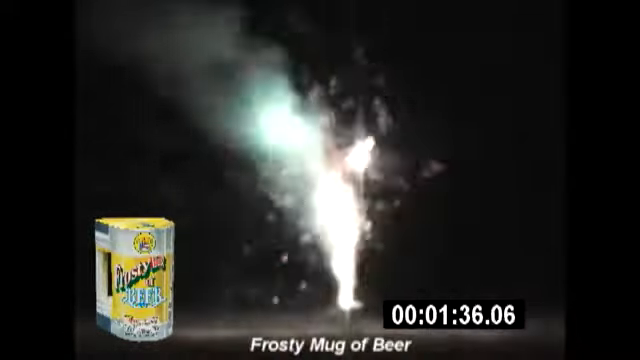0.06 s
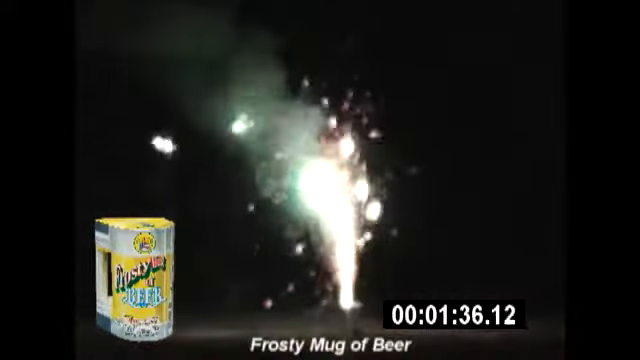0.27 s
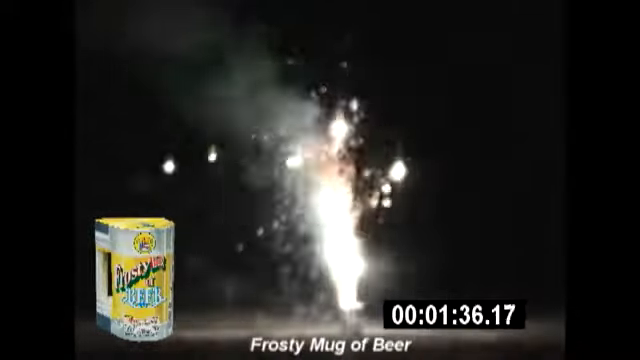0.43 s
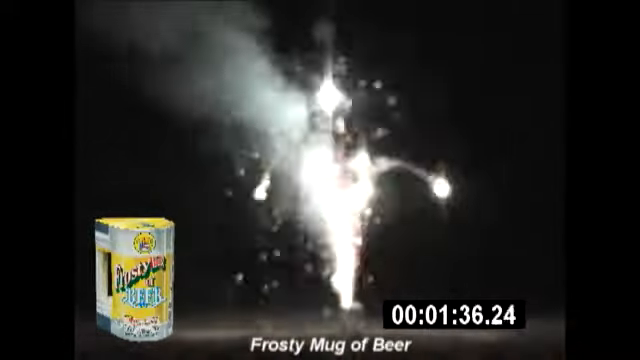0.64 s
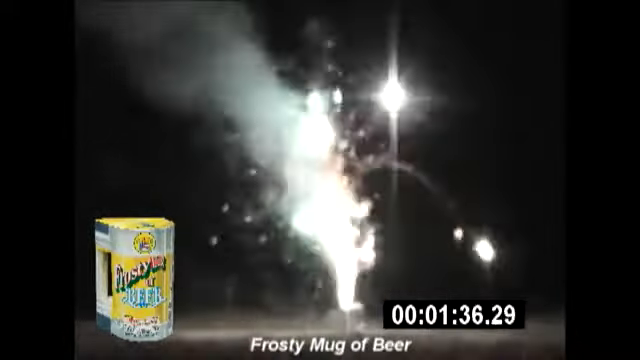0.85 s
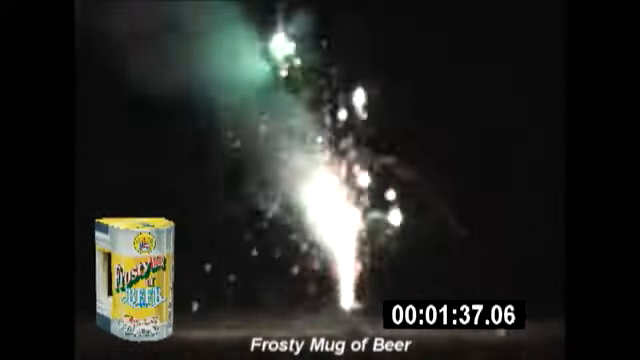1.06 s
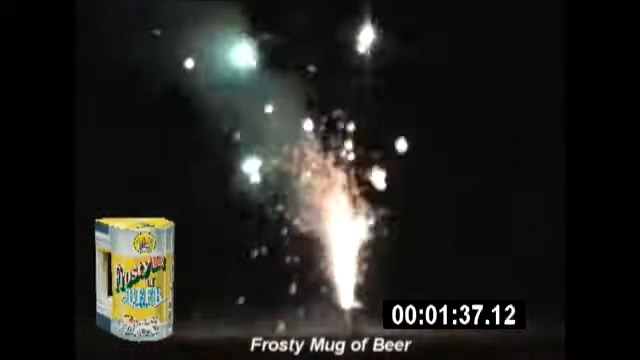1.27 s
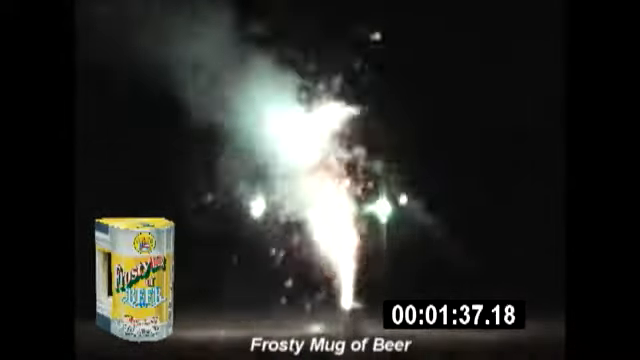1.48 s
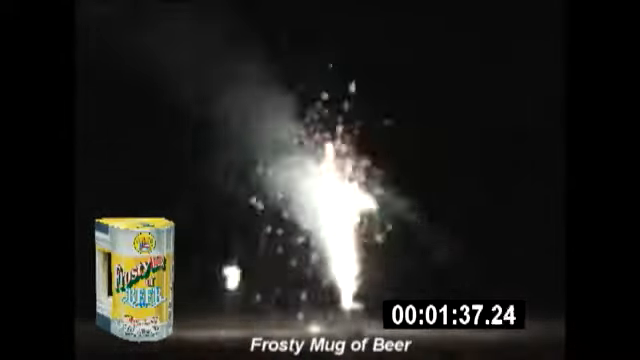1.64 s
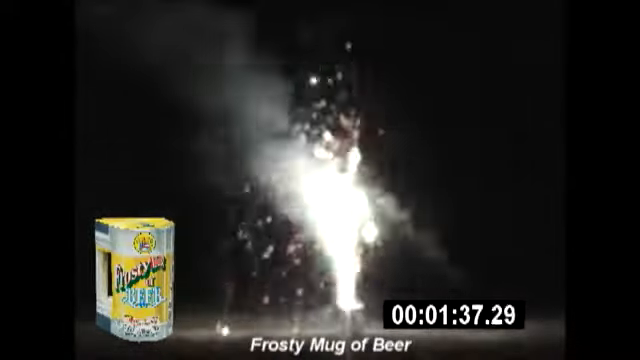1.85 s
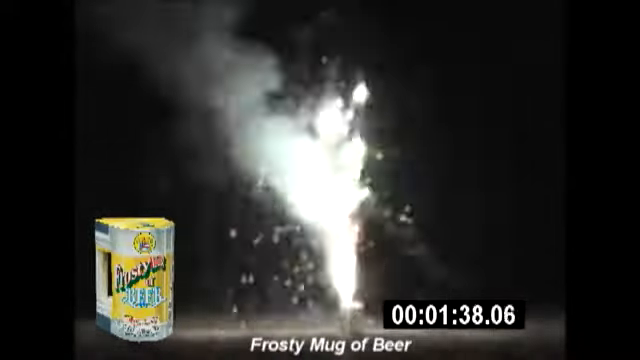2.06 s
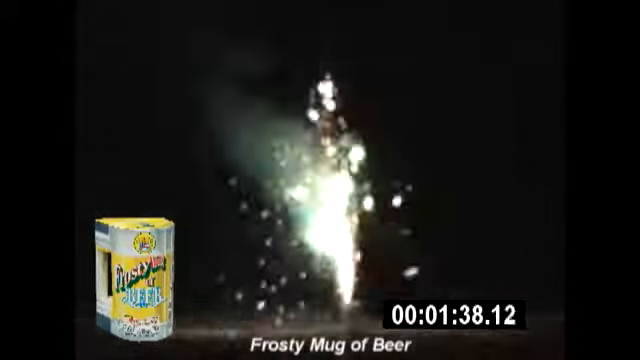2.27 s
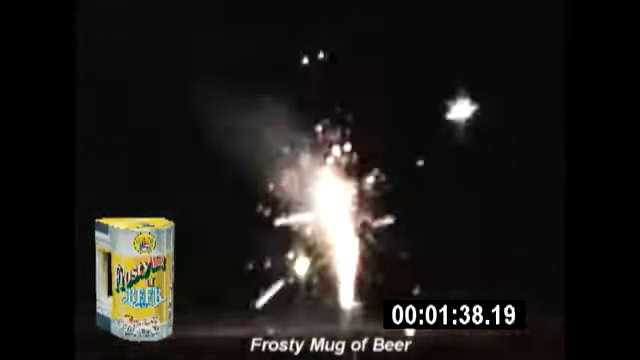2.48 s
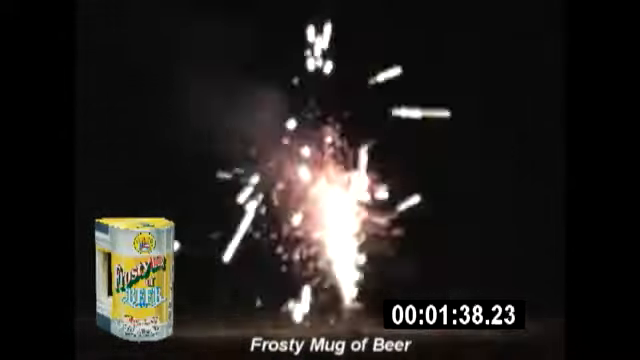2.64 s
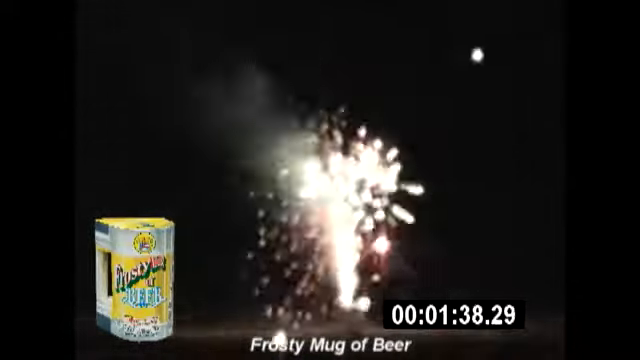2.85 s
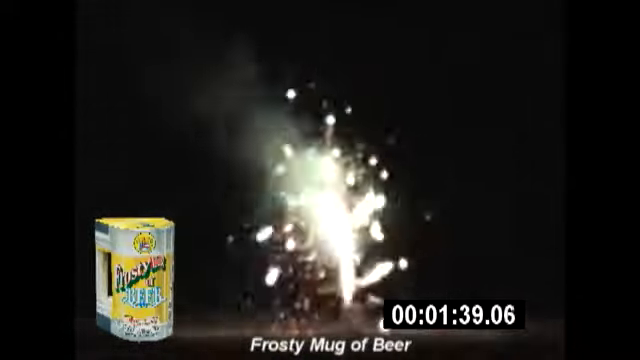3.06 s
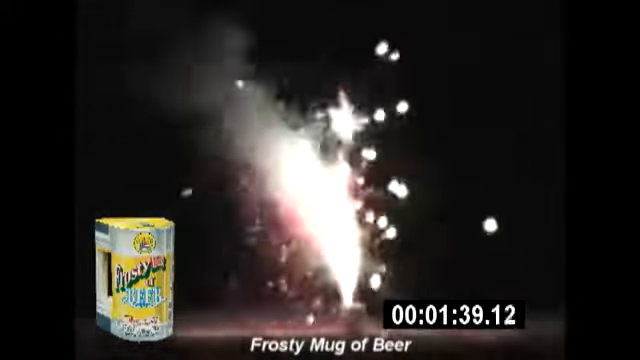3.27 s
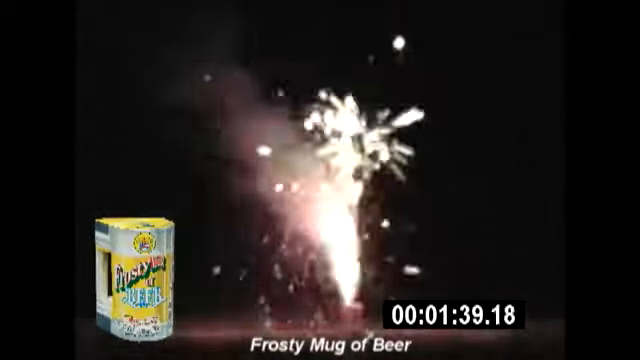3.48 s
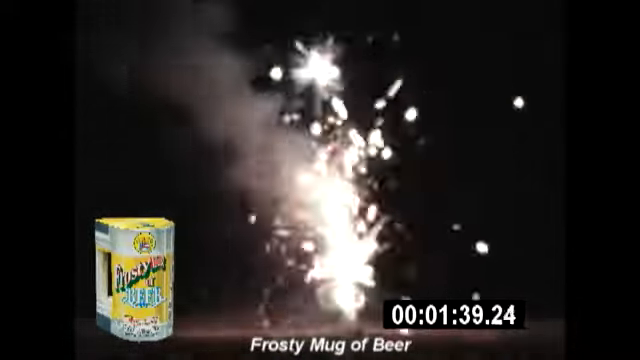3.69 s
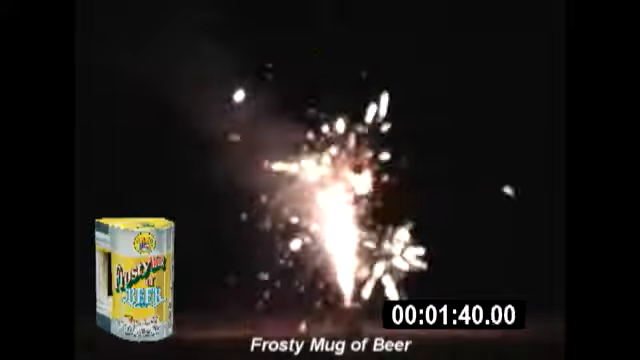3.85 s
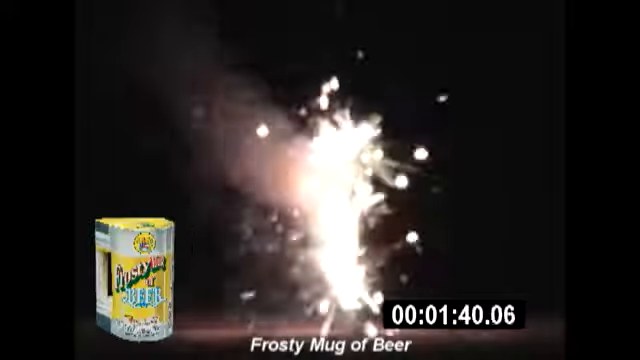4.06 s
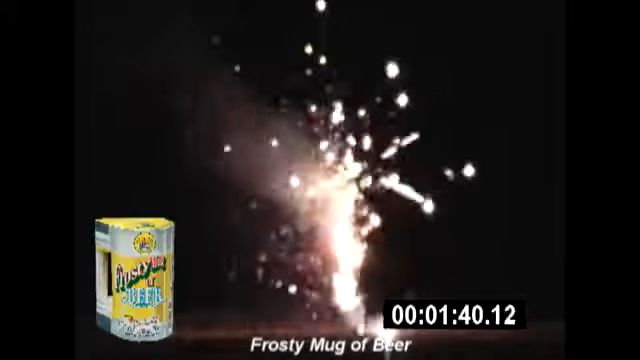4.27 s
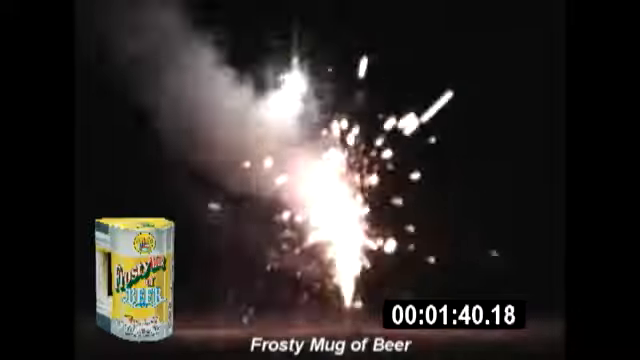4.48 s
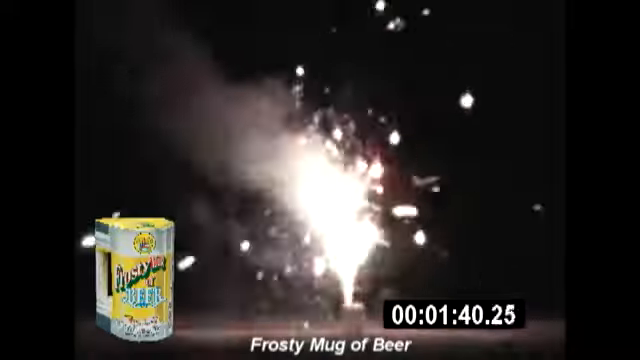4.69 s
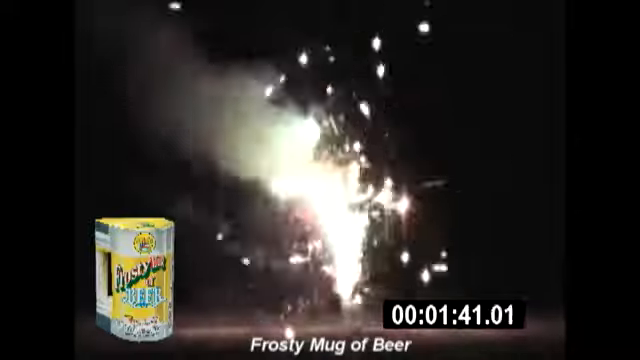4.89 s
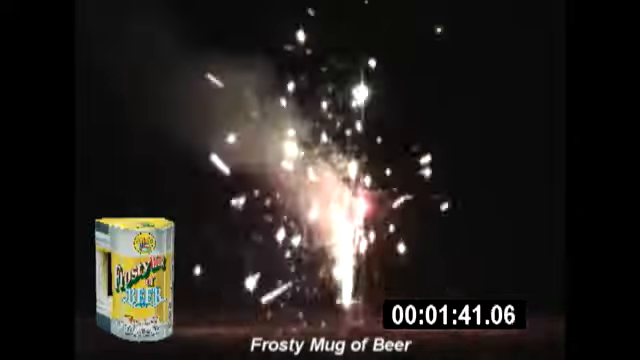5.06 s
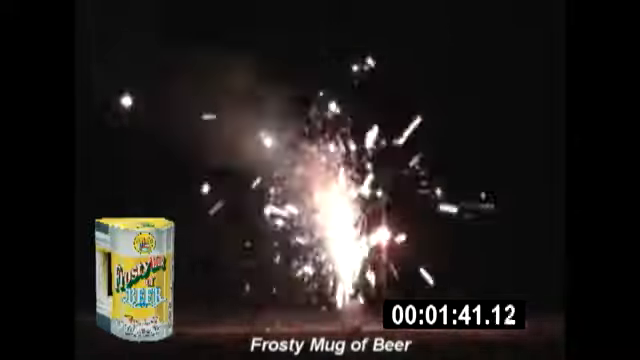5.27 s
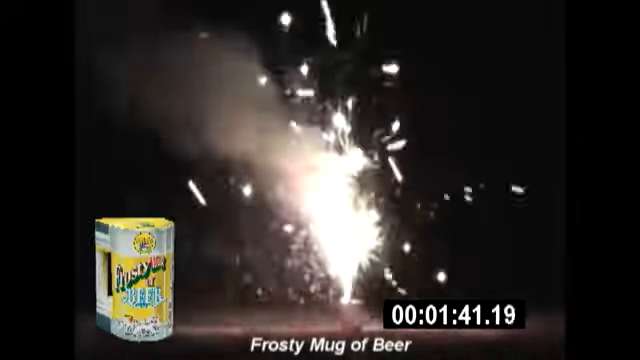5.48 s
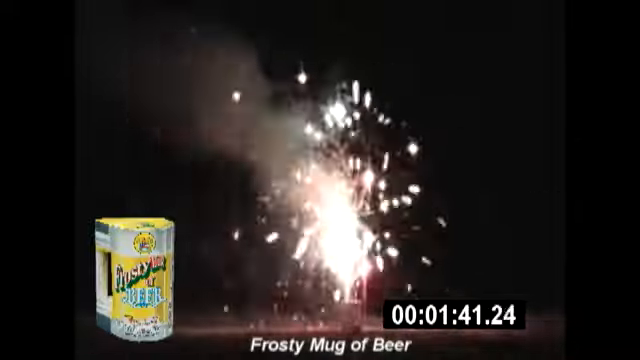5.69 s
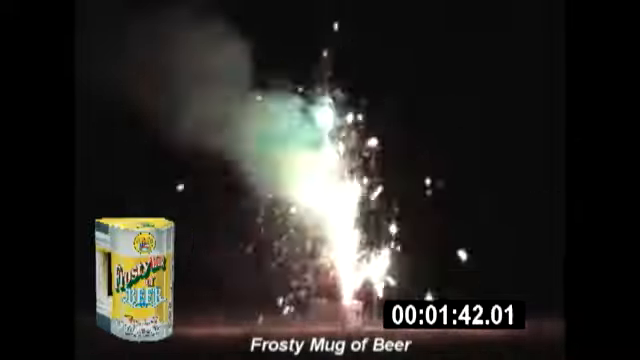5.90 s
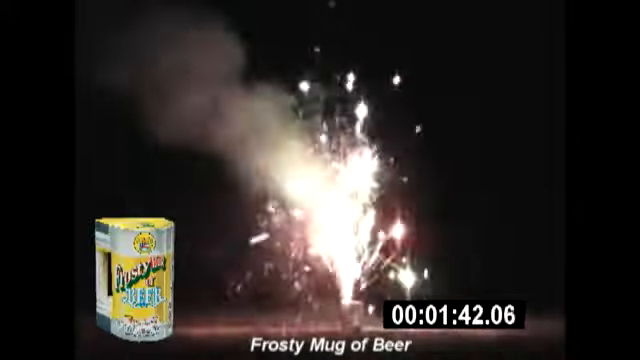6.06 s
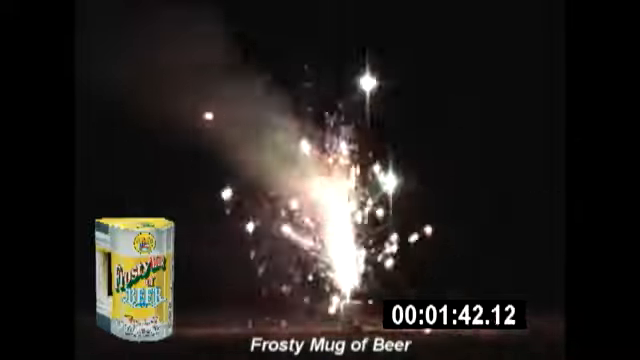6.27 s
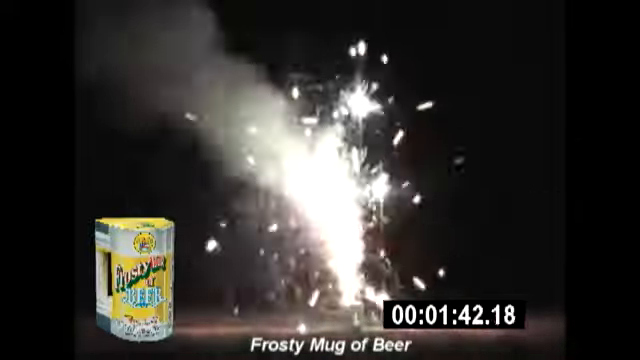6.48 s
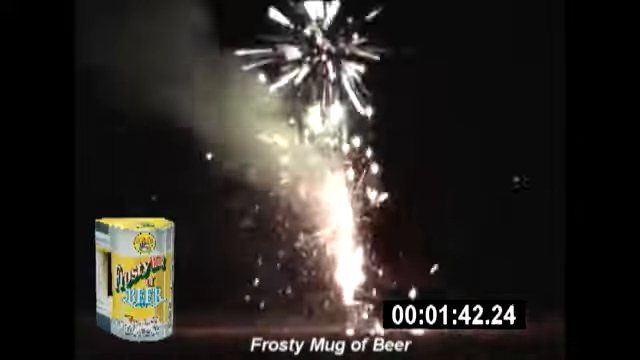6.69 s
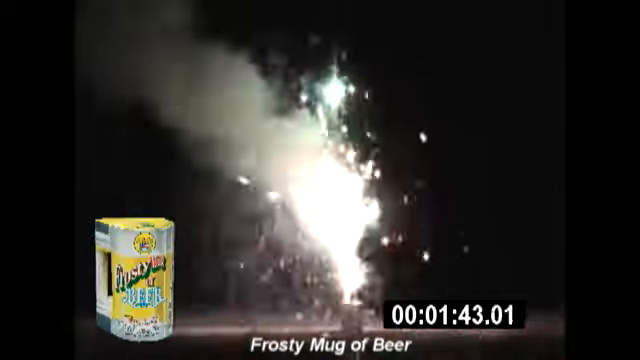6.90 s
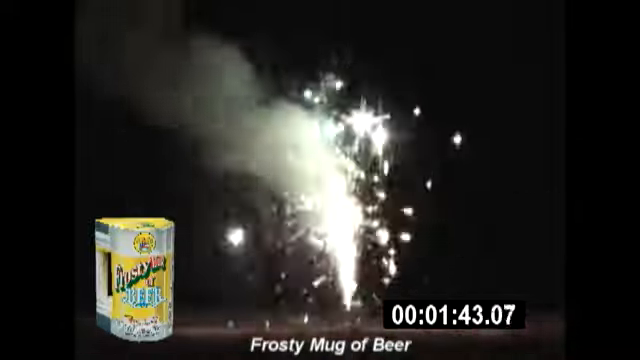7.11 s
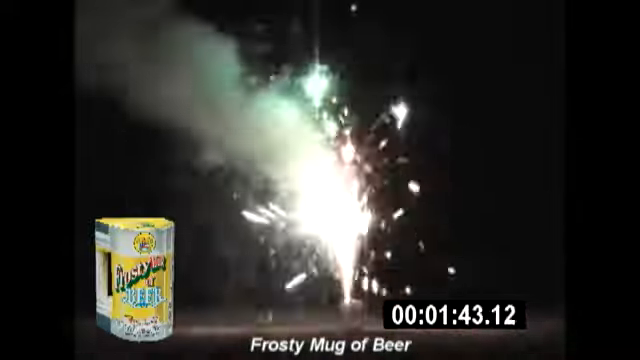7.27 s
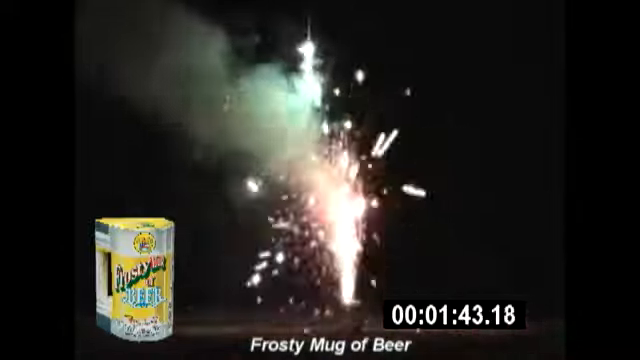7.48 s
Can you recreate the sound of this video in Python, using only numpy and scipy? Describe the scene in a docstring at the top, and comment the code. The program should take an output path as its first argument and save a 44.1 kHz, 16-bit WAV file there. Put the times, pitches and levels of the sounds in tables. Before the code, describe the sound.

Steady rushing jet of burning sparks outdoors, soon buried under a frantic barrage of sharp, dry snaps and pops, the loudest ones distorting.

```python
"""A fountain firework stands on the ground at night, some metres from a microphone.
At first a jet of burning gas roars and hisses: two bands of noise whose levels follow a table.
From 1.7 s stars crackle in the spray; from about 2.2 s the jet is heard at a lower, uneven level.
Each star is a tiny blast that rings the microphone housing, repeats via the ground and sizzles;
smaller bursts follow, a wall answers, and the loudest blasts overload the recorder.
Faint dull ticks sputter all along."""
import sys
import numpy as np
from scipy import signal
from scipy.fft import rfft, irfft, next_fast_len
from scipy.io import wavfile
from scipy.ndimage import uniform_filter1d

SR = 44100
rng = np.random.default_rng(int(sys.argv[2]) if len(sys.argv) > 2 else 0)


def master(y):
    """Save y as 16-bit WAV."""
    cut = np.clip(np.atleast_2d(y).T, -1, 1)
    pcm = np.round(cut * 32767)  # scale
    wavfile.write(sys.argv[1], SR, pcm.astype(np.int16))


N = 332514  # length in samples

# bursting stars: t/s, level/dB, body against that level/dB
STARS = [(1.699, -9.5, -4.5), (1.888, -25.5, 1), (2.0096, -10.5, -5.5), (2.124, -4.5, -2),
         (2.1448, -28, -2), (2.2081, -12.5, 3), (2.2611, -2.5, -5.5), (2.268, -23, -6), (2.2823, -27, -2),
         (2.2849, -19, 0), (2.2887, -14, -6), (2.308, -8, -5), (2.3737, -3, 0), (2.42, -12.5, -1.5),
         (2.4368, -17, 5), (2.4378, -9.5, -7), (2.457, -16.5, -3), (2.5417, -4.5, -2), (2.5647, 1.5, -7),
         (2.5875, -24, 3), (2.6196, -7.5, -8), (2.6664, -15.5, -14), (2.6892, -16, -15),
         (2.7136, -3.5, -1.5), (2.7191, -6.5, -2), (2.7413, -7, -8), (2.7493, -8, 2.5), (2.8141, -10.5, 0),
         (2.822, -6, 0), (2.831, -13, 0), (2.8339, -3, -6.5), (2.8413, -3, 5), (2.8474, -28, -16),
         (2.8543, -23, 2), (2.8587, -3.5, -2), (2.879, -21, -3), (2.8924, -10, -8), (2.9097, -7, -0.5),
         (2.9832, -15.5, 0.5), (3.0068, -6, -12), (3.0245, -21, -4), (3.029, -17, 0), (3.03, -12.5, -9),
         (3.0436, -21, 7), (3.0773, -9.5, -12), (3.1556, -21, -12), (3.1688, -4.5, -7), (3.1752, -31, -17),
         (3.1826, -13, -4), (3.2154, -14.5, 5), (3.2201, -16.5, 6), (3.2274, -7, -7), (3.2862, -12, -6.5),
         (3.2937, -22, -10), (3.3324, -12.5, -19), (3.3449, -10.5, 4.5), (3.3605, -6.5, -1.5),
         (3.3813, -8, -12), (3.397, -3.5, -1.5), (3.4167, -18, 4), (3.4273, -12, -9), (3.4473, -19, -6),
         (3.4641, 3.5, 1.5), (3.4854, -15, -7), (3.5008, -17, -5), (3.504, -9.5, -8), (3.5121, -12.5, -6),
         (3.5585, -9, 3.5), (3.5757, -3.5, -9), (3.5951, -8, -5), (3.6012, -19, -12), (3.608, -8, -5),
         (3.6104, -14, -2), (3.632, -22, -10), (3.6449, -7.5, 0.5), (3.6773, -20, 0), (3.6803, -12.5, 2),
         (3.7407, 5, -6.5), (3.7526, -19, 1), (3.7607, -17.5, 5.5), (3.7706, -31, -6), (3.79, -23, -6),
         (3.797, -13.5, 0), (3.8043, -8, 6), (3.839, -2.5, -3.5), (3.846, -13, -6), (3.8495, -14, -11),
         (3.86, -29, 3), (3.8624, -17, 5), (3.869, -7.5, -9), (3.8926, -13, 0), (3.8973, -11.5, -7),
         (3.9093, -6, -24), (3.915, -27, -2), (3.921, -15, -3), (3.924, -10.5, -5), (3.9656, -11, -10),
         (3.9998, -2, -2.5), (4.0062, -17, -5), (4.0279, -18, -4), (4.0344, -16, -2), (4.0622, -9.5, -14),
         (4.0742, -19, -6), (4.0806, -8.5, -6), (4.1372, -17.5, -2), (4.152, -3.5, -1.5), (4.161, -14, 0),
         (4.17, -7, -23), (4.1818, -7, -17), (4.1915, -18, 7), (4.1946, -8, -2), (4.2042, -9.5, -4),
         (4.2107, -22, -3), (4.2346, -3, 1.5), (4.2484, -15, -12), (4.2564, -11, -15), (4.2875, -26, -10),
         (4.2917, 0.5, -8), (4.3026, -12, -16), (4.3147, -36, -7), (4.317, -13, -7), (4.3245, -19, -9),
         (4.3747, -13.5, 0), (4.3782, -14, -21), (4.3843, -24, 7.5), (4.4099, -22, -9), (4.4263, -10.5, -1),
         (4.4417, -11, -5.5), (4.4811, -9.5, -5.5), (4.5076, -14.5, -5.5), (4.5589, -21.5, -1),
         (4.5836, -23, 7.5), (4.587, -11, -6), (4.6101, -6, -4), (4.616, -21, -1), (4.6352, -22, -1),
         (4.6485, -10, -0.5), (4.6767, 2.5, -1.5), (4.688, -9, -11), (4.7128, -7, -14), (4.729, -6.5, -1.5),
         (4.7543, -7.5, -10), (4.7559, -10.5, -2), (4.778, -8.5, -3), (4.8024, -17, 1), (4.8343, -13, -12),
         (4.8514, 2.5, -10), (4.8613, -35, 0), (4.8763, -23, 4.5), (4.8964, -9.5, -5), (4.9333, -12, -1),
         (4.9384, -17.5, 0), (4.9421, -4, -7), (4.9486, -5.5, -1), (4.9555, -8, -18), (4.9637, -20, -3),
         (4.9694, -16, -9), (4.9752, -6.5, -9), (4.9954, -4.5, -5), (5.0118, -15, 0), (5.0237, -15, -20),
         (5.0553, -0.5, -3), (5.0774, -13.5, -1), (5.087, -31, -3), (5.1044, -10.5, -15),
         (5.1652, -13.5, -24), (5.18, -7, -8), (5.2168, -13, -10), (5.229, -12, -6), (5.2368, -4.5, -9),
         (5.245, -3.5, 2), (5.257, -36, -5), (5.2664, -37, -7), (5.2753, -8, -4), (5.3651, -15.5, -7),
         (5.3715, -21, 4.5), (5.3907, -10, -9), (5.3932, -3, -5), (5.4133, -7.5, -10), (5.4291, -8, -15),
         (5.4314, -12, -1), (5.4436, -11, 2.5), (5.466, -1, -15), (5.4747, -8, -3), (5.52, -21, 2.5),
         (5.5793, -21, -10), (5.5889, -11.5, -8), (5.6098, -17, -16), (5.6214, -13.5, -2), (5.629, -8, -4),
         (5.637, -26, -9), (5.6399, -15, -7), (5.6443, -4.5, -2), (5.6803, -9, -9), (5.6882, -14, 2),
         (5.6965, -3.5, -8.5), (5.7092, -6.5, -4), (5.7133, -21, -1), (5.7184, -26, 1), (5.728, -25, -6),
         (5.7363, -13, -6), (5.7432, -17, -2), (5.7627, -20, -13), (5.7934, -5.5, -1.5), (5.8138, -20, 3),
         (5.8326, -8, -23), (5.851, -18, -8), (5.8558, -22, -12), (5.861, -19, -8), (5.8651, -4.5, 0),
         (5.8864, -40, -6), (5.8942, -7.5, -9), (5.953, -11, 0), (5.9738, -16, -5), (5.9865, -13.5, -4),
         (6.0545, -3, -1.5), (6.1112, -14.5, 4), (6.116, -12, 0.5), (6.122, -19, -1), (6.1269, -10, -8),
         (6.132, -21, -16), (6.1524, -18, 0), (6.1612, -12.5, 3), (6.1712, -19.5, -11), (6.2168, -6.5, -6),
         (6.2209, -9.5, -2.5), (6.226, -12.5, 6), (6.2315, -18, 2), (6.2379, -12, -5), (6.2615, -2.5, -3.5),
         (6.275, -12, -5), (6.287, -12, -10), (6.301, -28, 7), (6.3028, -9, -0.5), (6.3813, -13.5, 3),
         (6.4248, -7, -15), (6.4416, -19, 0), (6.465, -8.5, -7), (6.4815, -8, -2), (6.4984, -16.5, 5),
         (6.5112, -18, -3), (6.5182, -9.5, -5), (6.5341, -6, -15), (6.541, -14.5, -2.5), (6.5585, -30, -6),
         (6.5729, -14, 0), (6.5797, -22, -4), (6.582, -18, -9), (6.5884, -2.5, -1), (6.5984, -20, -8),
         (6.6051, -11, -14), (6.644, -19, -8), (6.648, -3, -7.5), (6.661, -24, -10), (6.6685, -14, -4),
         (6.686, -13, -3), (6.7056, -26, 14), (6.7099, -3, -2.5), (6.716, -8, -10), (6.7227, -9, -9),
         (6.732, -9, -2.5), (6.7417, -31, -1), (6.7486, -17, -3), (6.7539, -19, 2), (6.7635, -10.5, -5),
         (6.8275, -17, -4), (6.8306, -5.5, -2), (6.838, -21, -14), (6.852, -22, 3), (6.8641, -20, -3),
         (6.8885, 1.5, -2), (6.9091, -26, -3), (6.912, -9, -9), (6.92, -27, -5), (6.9296, -8.5, -5.5),
         (6.9649, -11, 0), (6.9837, -33, -1), (6.9874, -3.5, -10), (6.997, -17, 1), (7.0178, -9, -14),
         (7.0324, -13, -5), (7.0808, -7, -4), (7.1012, -13, -12), (7.1412, -6, -5), (7.153, -18, 2),
         (7.184, -10, -11), (7.1974, -12, -1), (7.2035, -26, -3), (7.206, -10, -11), (7.2116, -9, -17),
         (7.2244, -25, -8), (7.2438, -22, -3), (7.2693, -4.5, -4.5), (7.3082, -11.5, -9),
         (7.3167, -11.5, -0.5), (7.3896, -10, -4), (7.4011, -8, -4), (7.4415, -6.5, -9), (7.4548, -8.5, 0),
         (7.477, -18, 5), (7.4789, -5.5, -9), (7.5141, -7, -4)]
# ringing of the microphone housing and capsule: f/Hz, level/dB, time to fall by 60 dB/s
# the sharp snap of a blast rings the high tones, its body the middle ones, its thump the low ones
SNAP_TONES = [(8950, 0, 0.0016), (4870, 2, 0.0011), (8100, -7, 0.00057), (10406, -4.5, 0.0026),
              (13800, -10, 0.00017), (3530, -18.5, 0.0014)]
BODY_TONES = [(1993, -1.5, 0.0094), (1405, -1, 0.0038), (2606, 2, 0.0018), (1170, -24.5, 0.0033)]
THUMP_TONES = [(468, 0.5, 0.011), (600, -2, 0.018), (242, 1, 0.023)]
# sizzle after a blast, from burning crumbs, then scattered returns: level/dB, time to fall by 60 dB/s
SIZZLE = [(-8.5, 0.0091), (-12, 0.039)]
# level at which the jet is heard, lower during the crackle: t/s, roar level/dB, hiss level/dB
JET_LEVELS = [(0.0, -33.5, -32.5), (1.0, -35, -33.5), (2.1, -35, -34.5), (2.3, -41, -44),
              (2.85, -41, -44.5), (3.1, -38, -41.5), (3.35, -40.5, -38), (3.8, -43, -63), (4.2, -47, -46),
              (4.7, -43.5, -45), (5.25, -43.5, -44), (5.6, -39.5, -40), (6.0, -44.5, -44),
              (6.45, -38.5, -39), (6.8, -51, -56), (7.54, -46, -56)]
# tone colour of the roar in the tube: f/Hz, level/dB per Hz
ROAR_COLOUR = [(15, -63), (25, -31), (43, -16), (65, -18), (199, 0), (341, -5.5), (381, -19.5), (483, -3.5),
               (566, -14), (652, -10.5), (840, -20), (1100, -33), (1430, -56), (2420, -120)]
# tone colour of the hissing spray: f/Hz, level/dB per Hz
HISS_COLOUR = [(530, -46), (900, -15.5), (1050, -12), (1500, -5.5), (1710, -7), (2000, 3), (2220, -10),
               (2660, -5), (3420, -6.5), (4400, 0), (5800, -1.5), (6600, -9.5), (9200, -6.5), (10500, -8.5),
               (15500, -36)]
# hard surfaces near by: delay/s, level/dB
HARD_ECHOES = [(.00145, -18), (.0065, -30)]
# tone colour the microphone capsule gives to the stars: f/Hz, level/dB
CAPSULE_COLOUR = [(30, 6.5), (100, 3.5), (10500, 1.5), (13000, 1.5), (16000, -6.5)]
# the two microphone ports: f/Hz, left minus right/dB, side minus middle/dB
PORT_COLOUR = [(60, 1.2, -19), (500, .6, -23), (2000, .6, -18), (5000, -.1, -12), (9000, -.2, -11.5),
               (14000, -1.6, -7.5)]

SNAP_DB = 7.5  # snap against the level of the star
TONE_SCATTER_DB = 1.8  # every star meets the housing from another angle
# thump against the level of the star: more with a strong body, less with a loud star
THUMP_DB, THUMP_PER_BODY, THUMP_PER_LEVEL, THUMP_SCATTER_DB = -24, 0.4, -0.39, 4
GROUND_S, GROUND_DB = 0.000329, 1  # scale of the extra path's delay; loudest ground return
FRAGMENTS, FRAGMENT_S = 1400, .02  # how many; mean delay after the parent star
FRAGMENT_DB, FRAGMENT_SPREAD_DB = -31, 10  # weakest against the parent star; range
SPUTTER_RATE, SPUTTER_DB = 20, -50  # ticks per second; level of the weakest
WALL_S, WALL_DB, WALL_T60_S, WALL_HZ = .0205, -21, .016, (500, 5500)  # delay, level, decay, band


def big_stars():
    """The loud stars: a stronger body brings more thump, a louder blast relatively less."""
    s, level_db, body_db = np.transpose(STARS).astype(float)
    thump_db = THUMP_DB + THUMP_PER_BODY * body_db + THUMP_PER_LEVEL * level_db
    thump_db = thump_db + THUMP_SCATTER_DB * rng.standard_normal(len(s))
    return np.array([s, level_db, body_db, thump_db])


def small_stars(parents):
    """Fragments burst soon after their parent star; the nozzle sputters dull ticks all along."""
    pick, wait, size = rng.random((FRAGMENTS, 3)).T
    fragments = parents[:, (pick * len(STARS)).astype(int)]
    fragments[0] -= FRAGMENT_S * np.log(wait)  # mostly short waits, a few long ones
    fragments[1] += FRAGMENT_DB + FRAGMENT_SPREAD_DB * size
    when, size, dull = rng.random((int(SPUTTER_RATE * N / SR), 3)).T
    ticks = np.array([when * N / SR, SPUTTER_DB + 7 * size, 8 + 9 * dull, -6 + 5 * dull])
    return fragments, ticks


def crackle(s, level_db, body_db, thump_db, facing=0.94):
    """Each star: a pressure step, again via the ground, then a sizzle of burning crumbs."""
    delay_chance, level_chance = rng.random((len(s), 2)).T
    later = s + GROUND_S * (0.228 + delay_chance)
    bounce = undb(GROUND_DB - 6.0 * level_chance)
    size = facing * undb(level_db)
    out = 0
    parts = ((SNAP_TONES, SNAP_DB), (BODY_TONES, body_db), (THUMP_TONES, thump_db))
    for tones, push_db in parts:
        scatter_db = TONE_SCATTER_DB * rng.standard_normal((len(s), len(tones))).T
        shares = undb(push_db + scatter_db)
        shares[1::2] *= -1  # neighbouring tones swing against each other
        for tone, share in zip(tones, shares):
            direct = train(s, size * share)
            via_ground = train(later, size * share * bounce)
            out = out - ring(direct + via_ground, [tone])
    for db, t60 in SIZZLE:
        keep = 1e-6 ** (1 / (t60 * SR))  # share of the power left after one sample
        power = signal.lfilter([1], [1, -keep], train(s, size ** 2))
        noise = rng.standard_normal(N)
        sizzle = unit(ring(noise, SNAP_TONES) + undb(-22) * ring(noise, BODY_TONES))
        out += undb(db) * np.sqrt(np.abs(power)) * sizzle
    return out


def ring(x, tones):
    """A push sets off tones that start at full swing and die away."""
    t = np.arange(2048) / SR
    answer = 0
    for hz, db, t60 in tones:
        answer = answer + undb(db) * np.cos(2 * np.pi * hz * t) * 1000. ** (-t / t60)
    return signal.oaconvolve(x, answer)[:N]


def train(s, size):
    """Single pushes at the given times, each split over two samples to place it finely."""
    at = np.clip(s * SR, 0, N - 2)
    i = at.astype(int)
    early = np.bincount(i, size * (1 + i - at), N)
    late = np.bincount(i + 1, size * (at - i), N)
    return early + late


def jet():
    """Turbulent flow roars in the tube; sputtering grains roughen the hiss of the spray."""
    s, roar_db, hiss_db = np.transpose(JET_LEVELS)
    t = np.arange(N) / SR
    surge = walk(25.52)  # shared by roar and hiss
    roar = turbulence(ROAR_COLOUR, 20., count=6, surge_db=1.5 * surge, flutter_db=1.4)
    rough_db = .9 * surge + 1.5 * walk(350)
    hiss = turbulence(HISS_COLOUR, 640., count=5, surge_db=rough_db, flutter_db=1.3)
    return roar * undb(np.interp(t, s, roar_db)) + hiss * undb(np.interp(t, s, hiss_db))


def turbulence(colour, lo_hz, count, surge_db, flutter_db):
    """Swirling gas as octave bands of noise that surge together and flutter alone."""
    total = 0
    for lo in lo_hz * 2. ** np.arange(count):
        band = shape(rng.standard_normal(N), colour, lo, 2 * lo)
        total = total + band * undb(surge_db + flutter_db * walk(40))
    return unit(total)


def walk(rate):
    """Random levels, a new one every 1 / rate s, smoothed twice; spread near 1."""
    k = int(SR / rate)
    steps = np.repeat(rng.standard_normal(N // k + 1), k)
    return 1.5 * uniform_filter1d(uniform_filter1d(steps, k), k)[:N]


def surfaces(x):
    """Hard surfaces return sharp early echoes; a rough wall returns a thin, smeared copy."""
    t = np.arange(600) / SR
    fading_noise = rng.standard_normal(len(t)) * 1000. ** (-t / WALL_T60_S)
    rough = signal.lfilter(*signal.butter(2, WALL_HZ, "band", fs=SR), fading_noise)
    smeared = signal.fftconvolve(x, rough / np.linalg.norm(rough))[:N]
    wall = np.roll(smeared, int(WALL_S * SR))
    echoes = sum(undb(db) * np.roll(x, int(lag * SR)) for lag, db in HARD_ECHOES)
    return x + undb(WALL_DB) * wall + echoes


def shape(x, table, lo_hz=0.72, hi_hz=30000., column=1):
    """Colours a sound by a table of f/Hz and level/dB, inside a band with soft edges."""
    size = next_fast_len(N)
    hz = np.arange(size // 2 + 1) * SR / size + 1  # 1 Hz up, to avoid the log of zero
    table = np.array(table, float)
    gain = undb(np.interp(np.log(hz), np.log(table[:, 0]), table[:, column]))
    gain = gain / np.sqrt((1 + (lo_hz / hz) ** 8) * (1 + (hz / hi_hz) ** 8))
    return irfft(rfft(x, size) * gain, size)[:N]


def undb(db):
    """Turns decibels into a factor for the sound pressure."""
    return 10 ** (np.asarray(db) / 20)


def unit(x):
    """Scales to an average strength (rms) of 1."""
    return x / np.sqrt(np.mean(x ** 2))


def scene():
    """Stars and jet reach two ports that face apart: left and right are middle plus or minus side."""
    big = big_stars()
    stars = np.hstack([big, *small_stars(big)])
    mid = shape(surfaces(crackle(*stars)), CAPSULE_COLOUR) + jet()
    # stars burst left and right of the axis, and the spray is wide
    aside = rng.standard_normal(stars.shape[1])
    side_stars = shape(surfaces(crackle(*stars, facing=aside)), CAPSULE_COLOUR)
    side = shape(undb(-6.5) * jet() + side_stars, PORT_COLOUR, column=2)
    # half of the difference between the ports goes to each
    tilt = shape(mid, [(hz, db / 2) for hz, db, _ in PORT_COLOUR]) - mid
    return np.array([mid + tilt + side, mid - tilt - side])


def record(dry):
    """The loudest blasts are clipped flat; the deep bass is weakened and the top is cut off."""
    clipped = np.clip(dry, -.9, .9)
    blocked = signal.lfilter(*signal.butter(1, 35, "high", fs=SR), clipped)
    cut = signal.ellip(8, .2, 70, 16300, fs=SR, output="sos")  # steep cut above 16300 Hz
    return signal.sosfilt(cut, blocked)


dry = scene()
out = record(dry)
master(out)
```